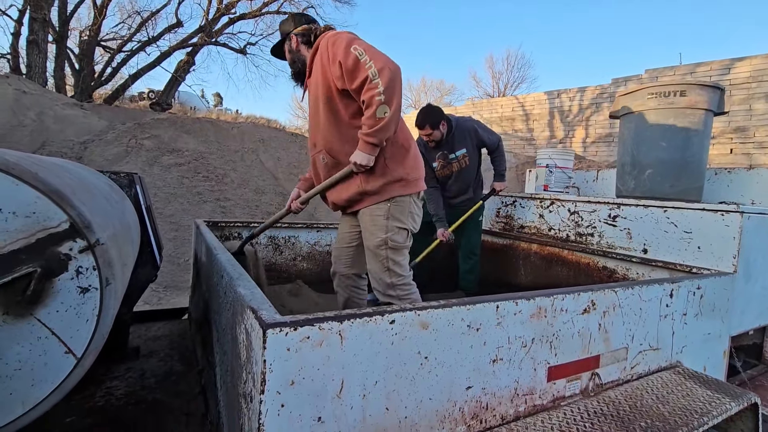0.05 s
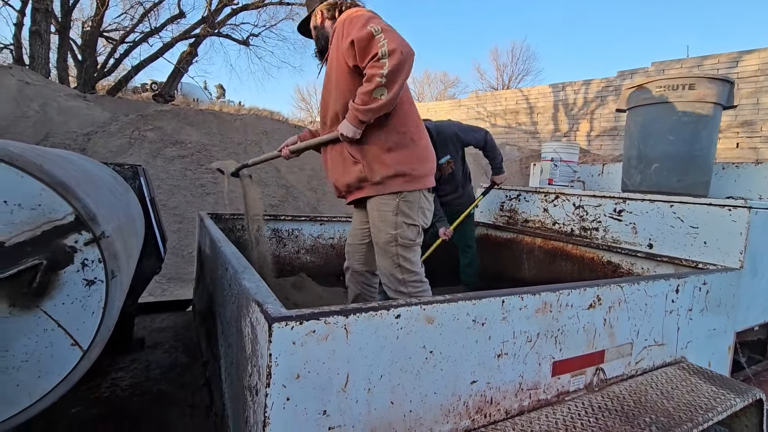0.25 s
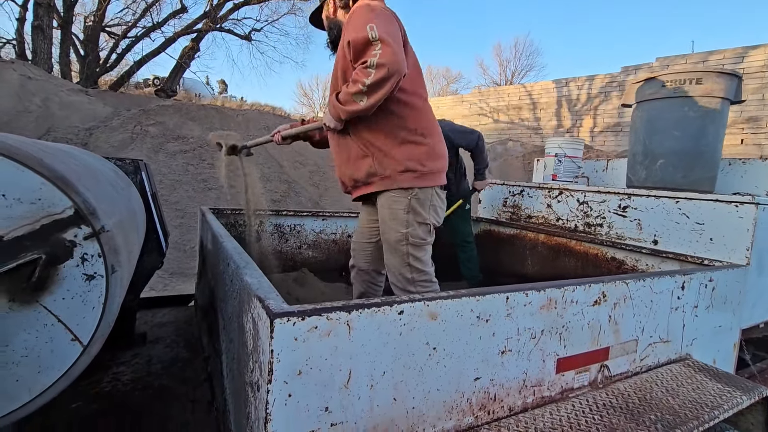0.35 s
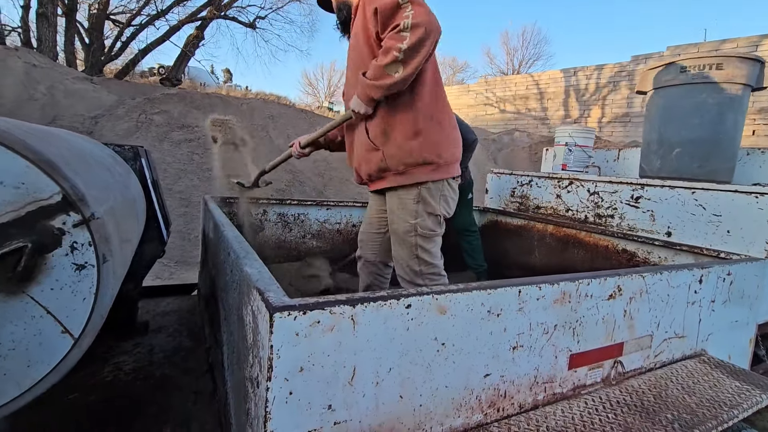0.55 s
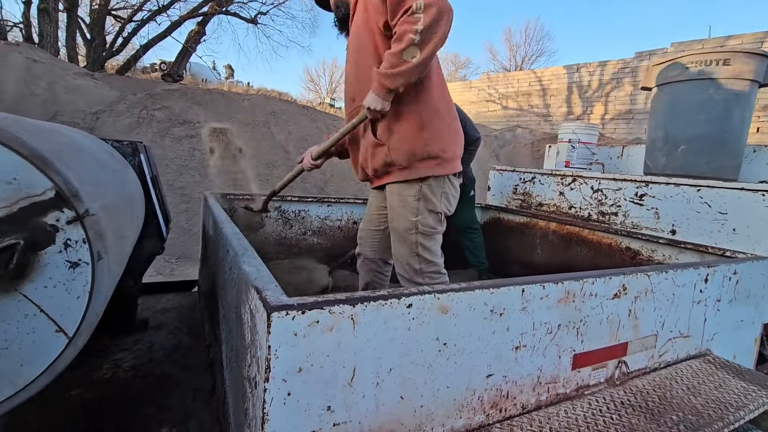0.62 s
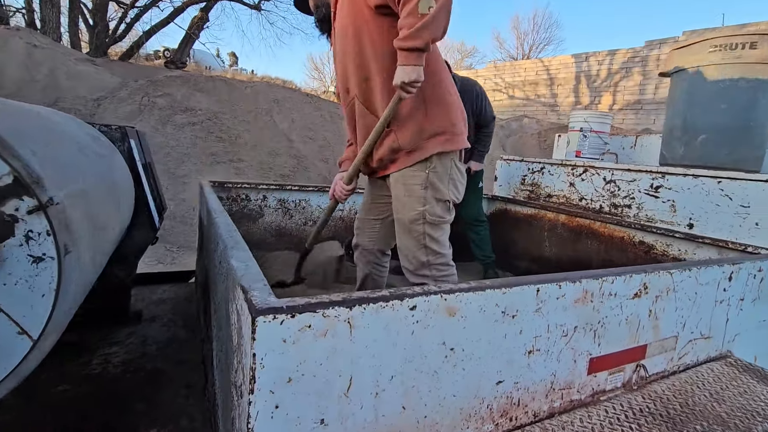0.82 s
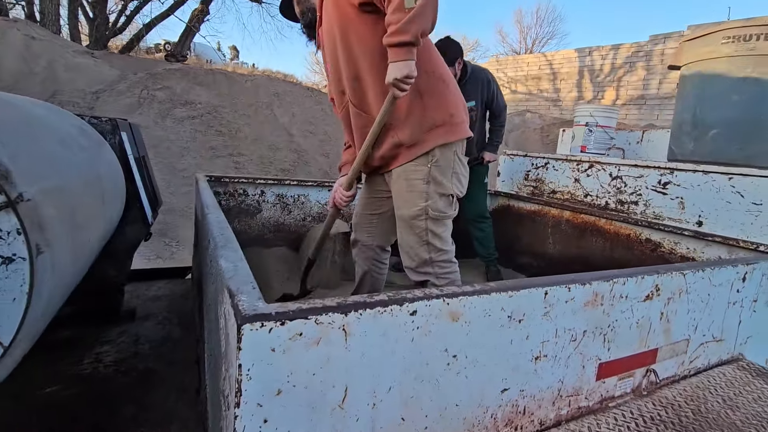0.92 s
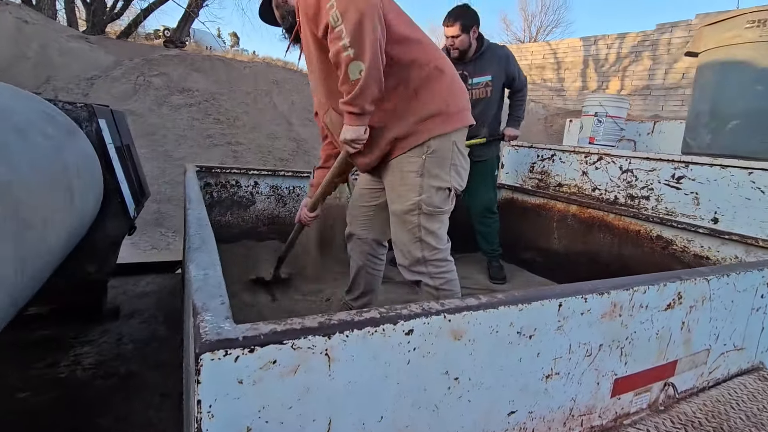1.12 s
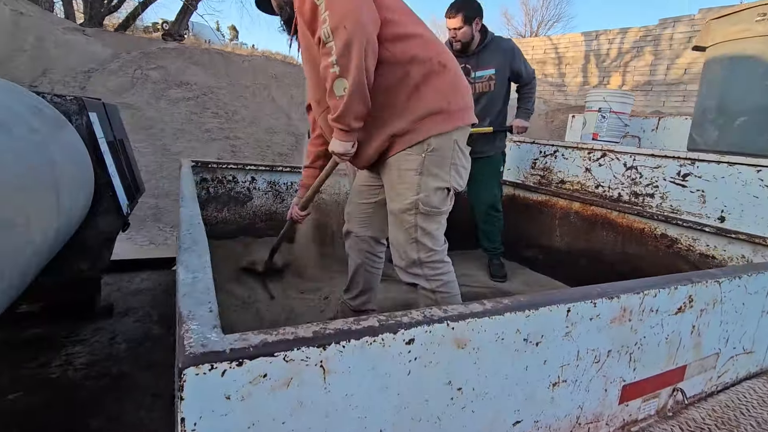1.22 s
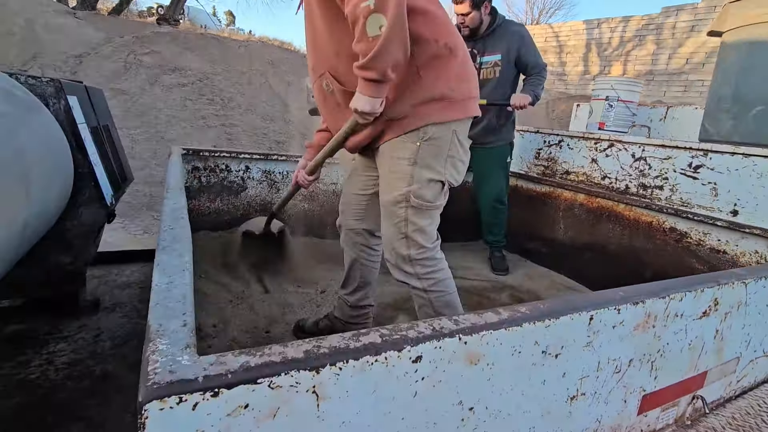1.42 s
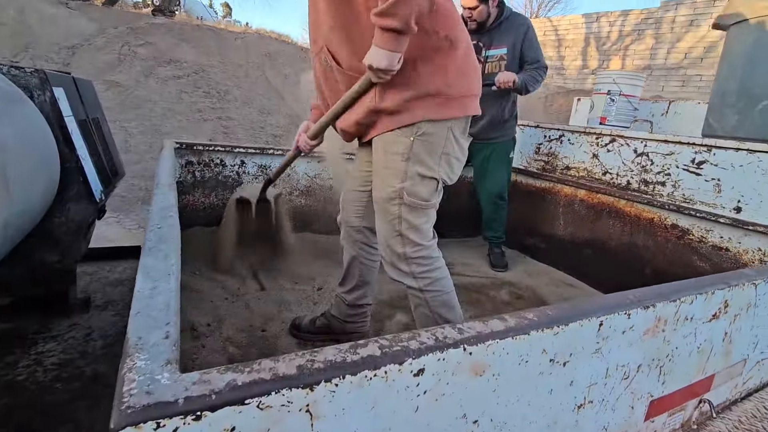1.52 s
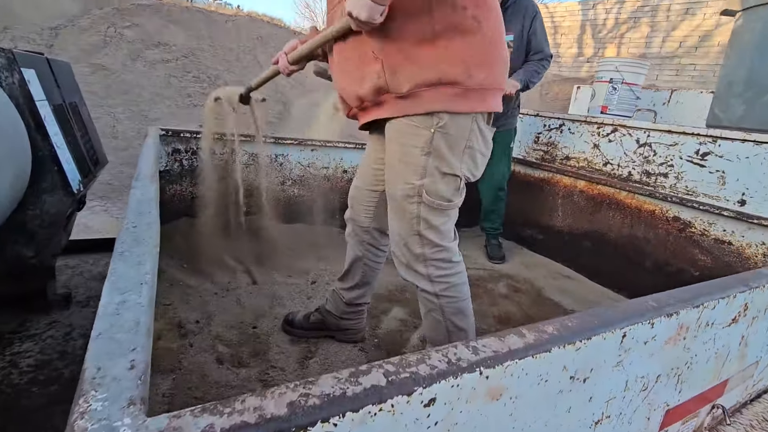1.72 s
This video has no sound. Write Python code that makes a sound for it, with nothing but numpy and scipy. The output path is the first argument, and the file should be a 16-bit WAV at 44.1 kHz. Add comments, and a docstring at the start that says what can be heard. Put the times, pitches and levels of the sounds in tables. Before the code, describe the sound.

A shovel bites into damp sand and grinds along a steel truck bed, clanging as clods thud down. A second, shorter stroke crunches with a hollow ring. Sand trickles over a low outdoor rumble, heard from nearby.

```python
"""Shovelling sand in a truck bed.

A shovel is driven twice into damp sand in a steel truck bed, outdoors. Each stroke bites with a
bright crunch, then grains grind along the blade and ring it. The blade clangs and groans on the
floor; on the second stroke the scoop rings hollow and sinks in pitch as it fills. Clods thud down,
mostly after the first stroke. Loose sand trickles and the bed's panels hum over a low rumble."""
import sys
import numpy as np
from scipy import signal
from scipy.fft import rfft, irfft, next_fast_len
from scipy.io import wavfile
from scipy.ndimage import uniform_filter1d

SR = 44100
rng = np.random.default_rng(int(sys.argv[2]) if len(sys.argv) > 2 else 0)


def unload_audio(sound):
    """Save the sound as a 16-bit wav file, at the path given as the first command line argument."""
    columns = np.transpose(np.atleast_2d(sound))
    # keep every value between -1 and 1, then stretch to whole-number steps
    steps = np.round(np.clip(columns, -1, 1) * 32767)
    wavfile.write(sys.argv[1], SR, steps.astype(np.int16))


N = 77175
TIME_S = np.arange(N) / SR

# Envelopes of the background layers. Each row: time in seconds, relative level in dB.
RUMBLE_ENVELOPE_DB = [(0, -48), (.2, -42.5), (.6, -40.5), (.88, -38.5), (1.2, -39.5), (1.5, -40.5),
                      (1.62, -39), (1.75, -45)]
TRICKLE_ENVELOPE_DB = [(0, -64), (.035, -60), (.11, -63.5), (.19, -51.5), (.6, -42.5), (.68, -52),
                       (.8, -52), (.93, -55.5), (1.24, -56), (1.39, -62), (1.46, -58.5), (1.58, -53.5),
                       (1.64, -55.5), (1.75, -54)]
HUM_ENVELOPE_DB = [(0, -63), (.17, -54.5), (.23, -66), (.3, -63), (.42, -25), (.62, -47.5), (.68, -45.5),
                   (.95, -55.5), (1.1, -46.5), (1.27, -43.5), (1.4, -46), (1.52, -55), (1.63, -60),
                   (1.75, -76)]
# Spectra of the noise sources. Each row: frequency in Hz, relative level in dB.
RUMBLE_SPECTRUM_DB = [(15, -39), (25, 1.5), (45, -1.5), (65, 1), (100, -5), (170, -12.5), (260, -18),
                      (380, -28), (550, -29.5), (1500, -37)]
TRICKLE_SPECTRUM_DB = [(350, -31), (600, -34), (716, -1.5), (1030, -12), (1250, -5), (1760, -13),
                       (2280, -7), (2790, -9), (5360, 0), (8520, -6), (15500, -6)]
SCUFF_SPECTRUM_DB = [(250, 11.5), (420, 7), (850, 4.5), (1400, -2.5), (2200, -7.5), (3400, -5.5),
                     (7000, -17), (15000, -42)]
LONG_PUSH_SPECTRUM_DB = [(160, 0), (340, -13.5), (440, -3), (560, -2.5), (800, -1), (1000, -4),
                         (1300, -3.5), (1650, -9), (2000, -4), (2650, -8.5), (3200, -1), (5100, 1.5),
                         (6400, 1.5), (7500, -2.5), (8800, -6.5), (10500, -6.5), (11600, -6.5),
                         (13000, -9.5), (15500, -10)]
BITE_SPECTRUM_DB = [(300, -29), (700, -26), (1400, -0.5), (1850, -10.5), (2300, -1), (2900, -8.5),
                    (3900, 3), (4400, -2.5), (5100, 2), (6200, 1), (7400, 4), (8400, -6), (10300, -4),
                    (11400, 1.5), (12300, -7.5), (13400, -2.5), (15500, -10)]
GRIT_SPECTRUM_DB = [(330, -13.5), (480, -3), (680, -3), (850, -2.5), (1050, -12.5), (1400, -15),
                    (1800, -13), (2600, -15), (3500, -5.5), (4200, -1), (4900, 6.5), (6300, 0), (7400, 1),
                    (8700, -6), (10700, -4.5), (11700, -1), (13300, -7), (15500, -10.5)]
# Steel resonances. Each row: frequency in Hz, bandwidth in Hz, relative level in dB.
PANEL_MODES = [(112, 66, 1), (198, 22, -1.5), (224.5, 36, 6), (284, 42, -12), (410, 17, -12)]
BLADE_MODES = [(1180, 79, -5), (1289, 39, -2.5), (1347, 17, 2), (1380, 28, -3.5), (1467, 20, -7),
               (1710, 12, -14), (4530, 21, -15), (5430, 29, -13), (6340, 12, -5), (7170, 25, -6)]
SCOOP_MODES = [(680.5, 19, -3), (829, 33, 4), (967, 46, -5), (1088, 27, -1.5), (1214, 48, -8),
               (1371, 22, -6), (1501, 24, -0.5), (2270, 82, -9)]

# Soft scuffs in the sand. Each row: start in seconds, level in dB, hold in seconds.
SCUFF_EVENTS = [(0, -57.5, 0.044), (.225, -40, .05), (0.526, -37, 0.075), (1.171, -39.5, 0.037),
                (1.689, -52, 0.066)]
# Stray grains, blade catches and snapping grit. Each row: start in seconds, level in dB.
TICK_EVENTS = [(0.099, -48), (.675, -58), (1.589, -38.5)]
KNOCK_EVENTS = [(0.3188, -21), (0.333, -16.5), (0.3659, -8.5), (0.3911, -20.5), (0.4282, -11.5),
                (0.4511, -16), (.467, -16.5), (0.4838, -14.5), (.497, -21), (0.517, -20), (0.594, -31)]
CRACK_EVENTS = [(0.339, -10), (0.367, -14), (0.4275, -23), (0.518, -18), (.591, -21), (1.093, -23),
                (1.120, -11), (1.137, -18), (1.1529, -11), (1.162, -13.5), (1.188, -26), (1.196, -21.5)]
# Long push along the floor, short push into the heap.
# Each row: time in seconds, relative grinding level in dB, relative blade ring level in dB.
LONG_PUSH_EFFORT_DB = [(.198, -55, -48), (.215, -23, -67), (.25, -23.5, -30.5), (.29, -18.5, -34.5),
                       (.325, -18, -24.5), (.35, -13.5, -31), (.372, -15.5, -21), (.395, -19, -33),
                       (.42, -20, -28), (.465, -17, -27.5), (.495, -22.5, -29.5), (.525, -20.5, -32.5),
                       (.56, -32.5, -45), (.583, -41.5, -54), (.598, -26, -50), (.614, -63, -64),
                       (.66, -66, -87)]
SHORT_PUSH_EFFORT_DB = [(.948, -64, -58), (.964, -36.5, -43), (.99, -28, -27), (1.012, -29.5, -39.5),
                        (1.03, -23.5, -37), (1.06, -25, -36), (1.09, -20.5, -34), (1.12, -17.5, -45),
                        (1.143, -23, -39), (1.16, -17.5, -67), (1.178, -55, -53), (1.198, -39, -66),
                        (1.22, -53, -60), (1.26, -85, -74)]
# Blade bites. Each row: start in seconds, level in dB, hold in seconds, tilt in dB per octave.
BITE_EVENTS = [(0.211, -17.5, 0.013, -1.5), (0.9763, -11, 0.0096, 2.06)]
# Judder swells. Each row: centre in seconds, level in dB, pitch in Hz, half length in seconds.
GROAN_EVENTS = [(0.347, -26.5, 231.3, 0.012), (0.404, -38, 246, 0.0064), (0.424, -24, 244.3, 0.016),
                (0.46, -32, 267, 0.017), (0.516, -25.5, 265, 0.014), (0.542, -25, 252, 0.018),
                (0.586, -27, 257.9, 0.012), (1.062, -28, 262.6, 0.0088), (1.074, -29.5, 258.8, 0.016),
                (1.138, -34.5, 225.5, 0.011), (1.163, -29.5, 225.7, .012)]
# Clod landings. Each row: start in seconds, level in dB, pitch in Hz, left minus right in dB.
CLOD_EVENTS = [(0.491, -20, 78.5, -12), (.505, -25, 112, -7), (0.52, -15.5, 140, 0), (0.531, -16, 73, 4),
               (0.551, -12, 89, -14), (0.58, -17.5, 67, -1.5), (0.598, -18.5, 173, -14),
               (0.644, -25.5, 46.6, 2), (0.85, -33, 54.1, -1), (1.055, -28.5, 47, -3)]
# Ring of the scoop. Each row: time in seconds, level in dB.
SCOOP_ENVELOPE_DB = [(.975, -32.5), (1.02, -35.5), (1.05, -31.5), (1.1, -35), (1.125, -30.5),
                     (1.158, -28.5), (1.19, -48), (1.24, -63)]
# Spectral hollow in the short push. Each row: time in seconds, depth from 0 to 1.
HOLLOW_DEPTH = [(1.0, 0), (1.05, 0.44), (1.09, 0.36), (1.17, 0.85), (1.2, 0)]

# Stereo width of the grains. Each row: frequency in Hz, side relative to mid in dB.
GRAIN_WIDTH_DB = [(60, -23), (250, -12), (700, -11.5), (1300, 1), (2300, 1.5), (4000, 0.5), (6000, -3),
                  (9000, 0), (15000, 0.5)]
# Stereo balances. Each row: frequency in Hz, left minus right in dB, of which lean() applies 70 %.
LONG_PUSH_BALANCE_DB = [(300, -7), (1300, 2.5), (2800, 0.5), (5000, 1), (9000, -2), (15000, -2.5)]
SHORT_PUSH_BALANCE_DB = [(300, -6), (750, 13), (1400, -1), (2800, -0.5), (4800, -2), (6200, -2.5),
                         (8000, 4), (15000, 5)]
MIC_BALANCE_DB = [(30, -0.5), (70, -3), (250, -2), (1300, 0.5), (2800, 0.5), (4500, -4), (6400, -3.5),
                  (7800, 6), (11400, 2), (13000, 13.5), (15800, 14)]
# Notches of the right microphone's port. Each row: frequency in Hz, gain in dB.
RIGHT_PORT_DB = [(100, -1.5), (8050, 1.5), (8650, -23), (9500, 1), (10500, -23), (11400, 4), (13000, -4.5),
                 (16000, 10.5)]


def from_db(db):
    """Decibels to gain."""
    return 10 ** (np.asarray(db) / 20)


def unit_rms(x):
    """Scale to rms 1."""
    return x / np.sqrt(np.mean(x ** 2) + 1e-20)


def envelope(rows, column=1):
    """Gain over time from a dB column; silent outside the rows."""
    rows = np.array(rows)
    return from_db(np.interp(TIME_S, rows[:, 0], rows[:, column], left=-120, right=-120))


def burst(start_s, hold_s, attack_s, release_s):
    """Exponential rise up to the start, hold, exponential fall."""
    age_s = TIME_S - start_s
    return np.exp(np.minimum(age_s, 0) / attack_s - np.maximum(age_s - hold_s, 0) / release_s)


def steady(x, window_s):
    """Hold the running rms at 1."""
    power = uniform_filter1d(np.mean(x ** 2, axis=0), int(window_s * SR))
    return x / np.sqrt(np.abs(power) + 1e-9)


def butter(x, hz, kind, order=2):
    """Butterworth filter."""
    return signal.sosfilt(signal.butter(order, hz, kind, fs=SR, output="sos"), x)


def colour(x, spectrum_db, share=1, tilt_db_per_oct=0):
    """Minimum-phase filter following a share of a spectrum, plus a tilt."""
    size = 2 * next_fast_len(N)
    hz, db = np.transpose(spectrum_db)
    octave = np.log2(np.maximum(np.fft.rfftfreq(size, 1 / SR), 1))
    gain_db = np.interp(octave, np.log2(hz), share * db + tilt_db_per_oct * np.log2(hz / hz.mean()))
    cepstrum = irfft(np.log(from_db(gain_db)))
    cepstrum[1:size // 2] *= 2
    cepstrum[size // 2 + 1:] = 0
    return irfft(rfft(x, size) * np.exp(rfft(cepstrum)))[..., :N]


def resonate(x, modes):
    """Parallel two-pole resonators; rms 1."""
    out = 0
    for hz, width_hz, db in modes:
        radius = np.exp(-np.pi * width_hz / SR)
        feedback = [1, -2 * radius * np.cos(2 * np.pi * hz / SR), radius ** 2]
        out = out + from_db(db) * unit_rms(signal.lfilter([1, 0, -1], feedback, x))
    return unit_rms(out)


def stereo(mid, side):
    """Mid and side to left and right."""
    return np.array([mid + side, mid - side])


def pan(db):
    """Channel gains for a left-minus-right level."""
    return from_db([[db / 2], [-db / 2]])


def lean(pair, balance_db):
    """Pan by frequency, using 70 % of the balance."""
    return np.array([colour(pair[0], balance_db, share=0.32), colour(pair[1], balance_db, share=-0.38)])


def flutter(hz):
    """Low-passed random wavering; rms 1."""
    return unit_rms(butter(rng.standard_normal(2 * N), hz, "low")[N:])


def grains(per_s, spread_db, clump_db):
    """Stereo clicks of uneven size, bunched by stick and slip; rms 1."""
    sizes = from_db(spread_db * np.minimum(rng.exponential(1, (2, N)), 4))
    signs = rng.choice([-1, 1], (2, N))
    hits = rng.random((2, N)) < per_s / SR
    mid, side = sizes * signs * hits * from_db(clump_db * flutter(hz=130))
    return unit_rms(stereo(mid, colour(side, GRAIN_WIDTH_DB)))


def rumble(width_db=-20):
    """Low outdoor rumble, nearly alike on both sides."""
    mid, side = rng.standard_normal((2, N))
    air = colour(stereo(mid, from_db(width_db) * side), RUMBLE_SPECTRUM_DB)
    air = butter(butter(air, 1700, "low"), 13.5, "high")
    return envelope(RUMBLE_ENVELOPE_DB) * steady(air, window_s=0.059)


def trickle(gain_db=3):
    """Fine sand runs off the blade and down the heap."""
    sand = colour(grains(per_s=7000, spread_db=1.12, clump_db=1.5), TRICKLE_SPECTRUM_DB)
    return from_db(gain_db) * envelope(TRICKLE_ENVELOPE_DB) * unit_rms(butter(sand, 430, "high"))


def bed_hum():
    """The bed's panels hum as feet shift and sand settles."""
    panels = resonate(grains(per_s=900, spread_db=3.5, clump_db=6), PANEL_MODES)
    return envelope(HUM_ENVELOPE_DB) * steady(butter(panels, 430, "low", order=4), window_s=0.078)


def scuffs():
    """Short dull rubs in the sand."""
    rubs = sum(from_db(db) * burst(start_s, hold_s, attack_s=0.014, release_s=0.025)
               for start_s, db, hold_s in SCUFF_EVENTS)
    sand = colour(grains(per_s=5000, spread_db=3.2, clump_db=3.5), SCUFF_SPECTRUM_DB)
    return rubs * unit_rms(butter(sand, 130, "high"))


def ticks():
    """Stray grains tick on the steel."""
    hits = sum(from_db(db) * burst(start_s, 0, attack_s=0.0004, release_s=0.004)
               for start_s, db in TICK_EVENTS)
    grit = grains(per_s=22000, spread_db=0.52, clump_db=1.5)
    return hits * unit_rms(butter(grit, 5300, "high"))


def push(effort_db, spectrum_db, balance_db, grind_db, ring_db, dulling_db_per_s, split_hz=6300):
    """Sand grinds along the blade and coarser grit rings it; the treble fades as it is buried."""
    sand = grains(per_s=9000, spread_db=2.5, clump_db=1.5)
    grind = unit_rms(butter(colour(sand, spectrum_db), 126, "high"))
    body = butter(grind, split_hz, "low", order=4)
    body = butter(body[:, ::-1], split_hz, "low", order=4)[:, ::-1]  # backward pass: zero phase
    start_s, end_s = effort_db[0][0], effort_db[-1][0]
    unity_s = start_s + 0.31 * (end_s - start_s)
    treble_db = -dulling_db_per_s * (np.clip(TIME_S, start_s, end_s) - unity_s)
    grind = body + (grind - body) * from_db(treble_db)
    grind *= from_db(grind_db) * envelope(effort_db)
    ring = resonate(grains(per_s=540, spread_db=2.4, clump_db=0), BLADE_MODES)
    ring = from_db(ring_db) * envelope(effort_db, column=2) * steady(ring, window_s=0.068)
    return lean(grind + ring, balance_db)


def bites():
    """The edge breaks the crust with a short bright crunch."""
    out = 0
    for start_s, db, hold_s, tilt in BITE_EVENTS:
        crust = grains(per_s=21000, spread_db=1, clump_db=0.5)
        crunch = unit_rms(colour(crust, BITE_SPECTRUM_DB, tilt_db_per_oct=tilt))
        out += from_db(db) * burst(start_s, hold_s, attack_s=0.0029, release_s=0.0024) * crunch
    return out


def knocks(rise_s=0.0014, sand_damping_hz=16):
    """The blade catches on the floor and clangs in all its modes, damped by sand."""
    age_s = TIME_S[:SR // 5]
    hz, width_hz, mode_db = np.transpose(BLADE_MODES)
    decays = np.exp(-np.pi * np.outer(width_hz + sand_damping_hz, age_s))
    rings = np.sin(2 * np.pi * np.outer(hz, age_s)) * decays
    clang = from_db(mode_db) @ rings * (1 - np.exp(-age_s / rise_s))
    clang /= np.abs(clang).max()
    out = np.zeros(N)
    for start_s, db in KNOCK_EVENTS:
        start = int(start_s * SR)
        out[start:start + len(clang)] += from_db(db) * clang
    return out


def cracks():
    """Coarse grit snaps under the edge."""
    snaps = sum(from_db(db) * burst(start_s, 0, attack_s=0.0004, release_s=0.002)
                for start_s, db in CRACK_EVENTS)
    grit = grains(per_s=22000, spread_db=0.52, clump_db=1.5)
    return snaps * unit_rms(colour(grit, GRIT_SPECTRUM_DB))


def groans(waver_rad=0.43, left_lag_s=0.00007):
    """The blade judders over the floor in nearly pure swells, later and weaker on the left."""
    judder = 0
    for centre_s, db, hz, half_s in GROAN_EVENTS:
        swell = from_db(db) * np.exp(-((TIME_S - centre_s) / half_s) ** 2 / 2)
        phase_rad = 2 * np.pi * (hz * TIME_S + rng.random()) + waver_rad * flutter(hz=35.3)
        judder += swell * np.sqrt(2) * np.sin(phase_rad)
    left = np.interp(TIME_S - left_lag_s, TIME_S, judder)
    return pan(db=-4) * np.array([left, judder])


def clods(decay_cycles=0.88, puff_db=-4.5, width_db=-3.5, cushion_hz=420):
    """Each clod lands with a damped thump and a dull puff near its pitch; sand cushions the top."""
    out = 0
    for start_s, db, hz, pan_db in CLOD_EVENTS:
        thump = -np.sin(2 * np.pi * hz * np.maximum(TIME_S - start_s, 0))
        mid, side = rng.standard_normal((2, N))
        puff = butter(stereo(mid, from_db(width_db) * side), 3.1 * hz, "low", order=4)
        puff = steady(butter(puff, 1.13 * hz, "high"), window_s=0.028)
        landing = burst(start_s, 0, attack_s=0.0011, release_s=decay_cycles / hz)
        out += from_db(db) * pan(pan_db) * landing * (thump + from_db(puff_db) * puff)
    return butter(out, cushion_hz, "low", order=3)


def scoop(pitch_drop=0.135, fill_at_s=1.103, fill_time_s=0.0086):
    """The scoop rings hollow in the heap; all its modes sink as it fills with sand."""
    ring = resonate(grains(per_s=1500, spread_db=2.8, clump_db=1.5), SCOOP_MODES)
    ring = steady(butter(ring, 3000, "low"), window_s=0.029)
    filled = (1 + np.tanh((TIME_S - fill_at_s) / fill_time_s)) / 2
    slowed_s = np.cumsum(1 - pitch_drop * filled) / SR
    sinking = np.array([np.interp(slowed_s, TIME_S, channel) for channel in ring])
    return envelope(SCOOP_ENVELOPE_DB) * pan(db=2) * sinking


def hollow(x, band_hz=(2410, 3820)):
    """A band drops out of the grinding while the blade is deep."""
    depth = np.interp(TIME_S, *np.transpose(HOLLOW_DEPTH))
    return x - depth * butter(x, band_hz, "band", order=1)


def bed_walls(x, t60_s=0.094, wet_db=-5.5, echoes_per_s=4000):
    """Quick reflections between the steel walls, independent on each side."""
    age_s = TIME_S[:SR // 4]
    shape = (2, len(age_s))
    echoes = rng.standard_normal(shape) * (rng.random(shape) < echoes_per_s / SR)
    echoes = butter(echoes * from_db(-60 * age_s / t60_s), 540, "high")
    echoes /= np.sqrt(np.sum(echoes ** 2, axis=1, keepdims=True))
    wet = from_db(wet_db)
    return (x + wet * signal.fftconvolve(x, echoes, axes=1)[:, :N]) / np.sqrt(1 + wet ** 2 / 2)


def scene():
    """Two shovel strokes with falling clods, over hum, trickle and rumble."""
    shovel = bites() + scuffs()
    long_push = push(LONG_PUSH_EFFORT_DB, LONG_PUSH_SPECTRUM_DB, LONG_PUSH_BALANCE_DB,
                     grind_db=1.3, ring_db=2.5, dulling_db_per_s=24)
    short_push = push(SHORT_PUSH_EFFORT_DB, GRIT_SPECTRUM_DB, SHORT_PUSH_BALANCE_DB,
                      grind_db=1.5, ring_db=0.5, dulling_db_per_s=8.4)
    shovel += ticks() + long_push + hollow(cracks() + short_push)
    return bed_walls(shovel) + knocks() + groans() + clods() + scoop() + bed_hum() + trickle() + rumble()


def record(dry, ceiling=1.1, cutoff_hz=15900):
    """Each microphone has its own colour; peaks are rounded and the top is cut."""
    left, right = lean(dry, MIC_BALANCE_DB)
    pair = np.array([left, colour(right, RIGHT_PORT_DB)])
    rounded = ceiling * np.tanh(pair / ceiling)
    return signal.sosfilt(signal.ellip(12, 0.1, 90, cutoff_hz, fs=SR, output="sos"), rounded)


dry = scene()
out = record(dry)
unload_audio(out)
```